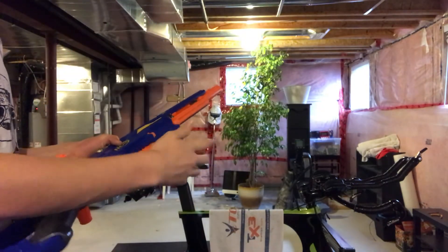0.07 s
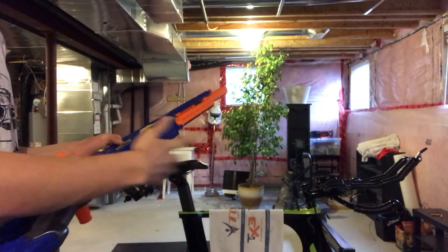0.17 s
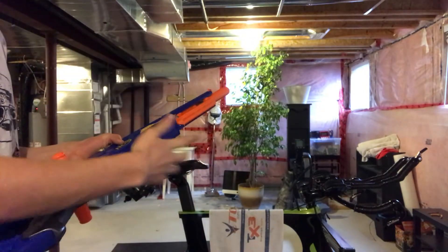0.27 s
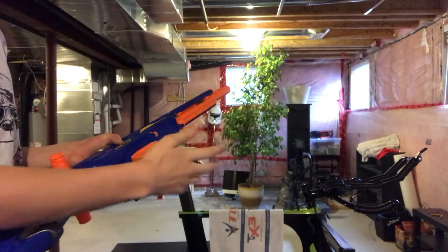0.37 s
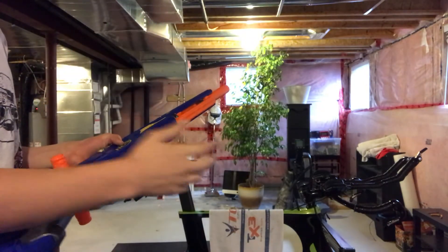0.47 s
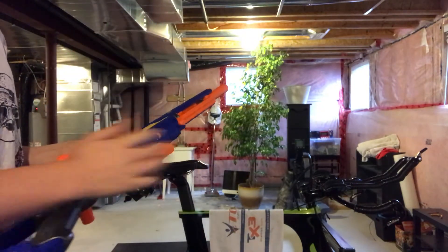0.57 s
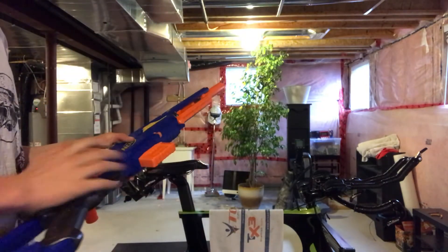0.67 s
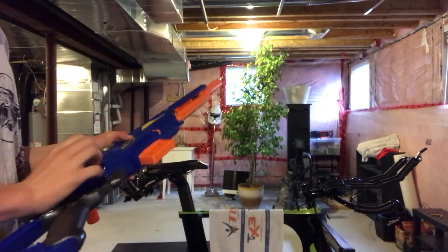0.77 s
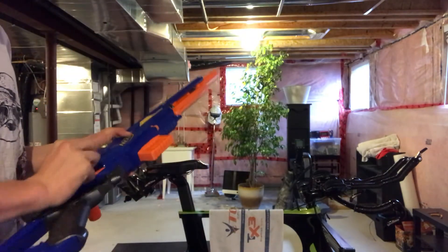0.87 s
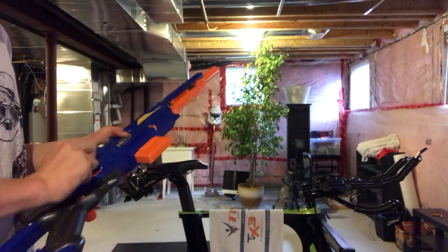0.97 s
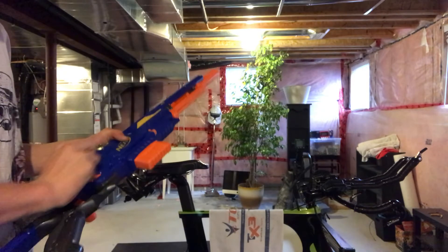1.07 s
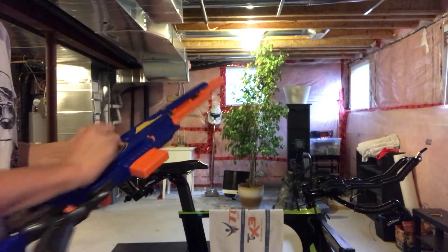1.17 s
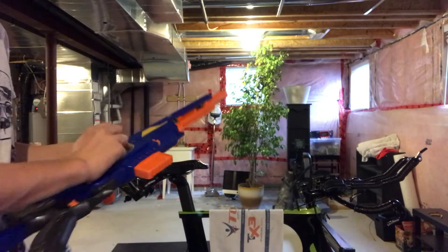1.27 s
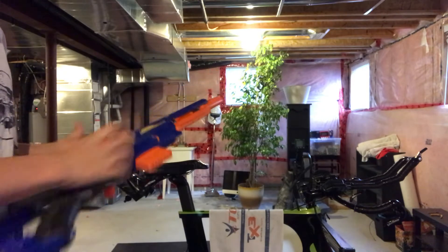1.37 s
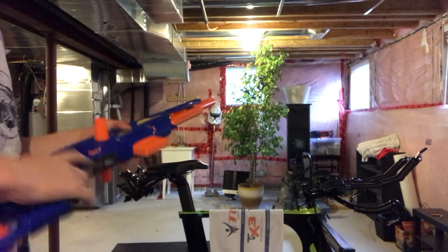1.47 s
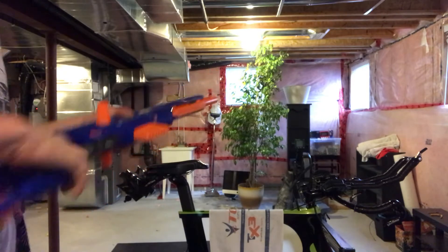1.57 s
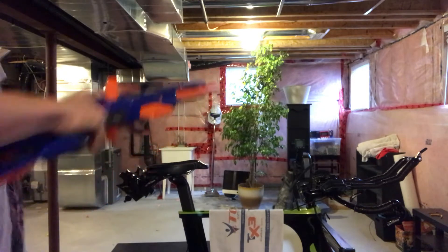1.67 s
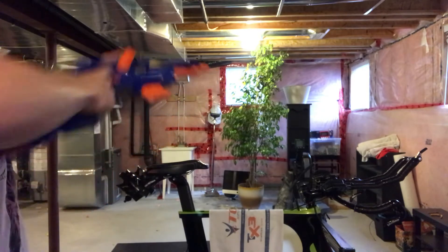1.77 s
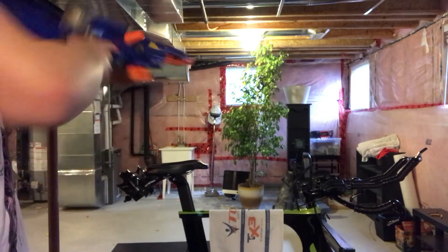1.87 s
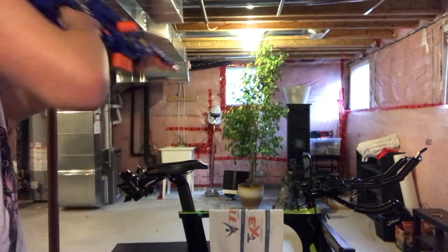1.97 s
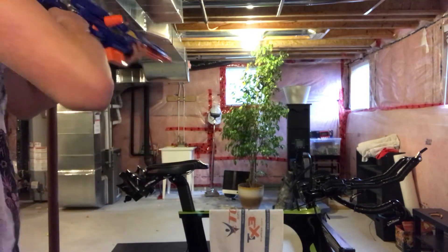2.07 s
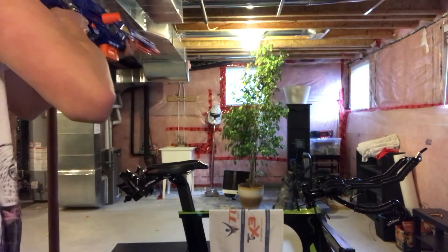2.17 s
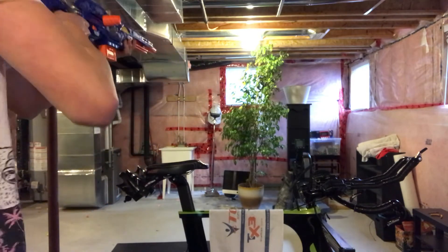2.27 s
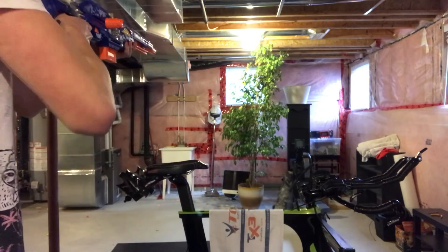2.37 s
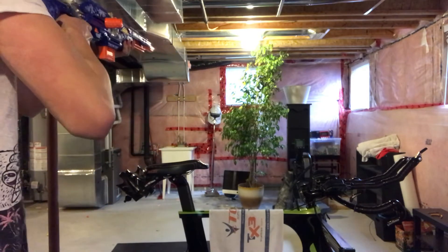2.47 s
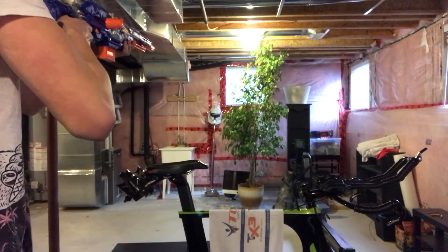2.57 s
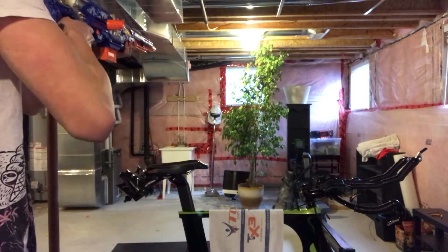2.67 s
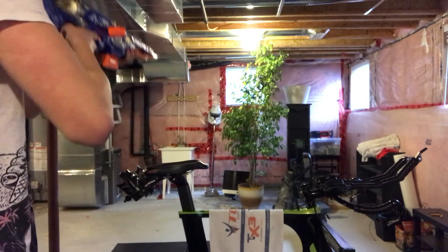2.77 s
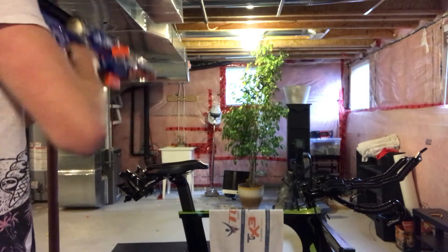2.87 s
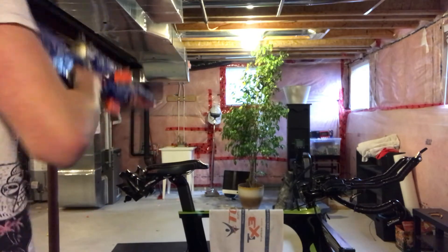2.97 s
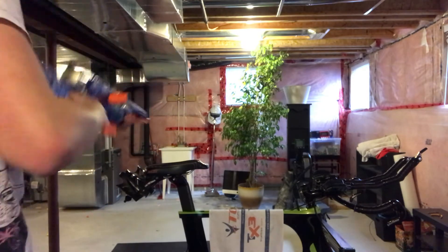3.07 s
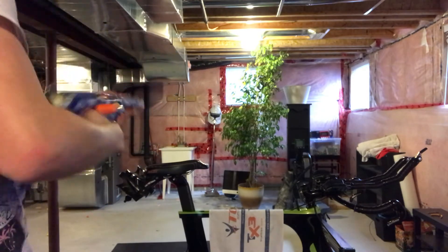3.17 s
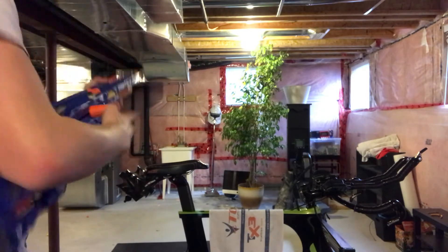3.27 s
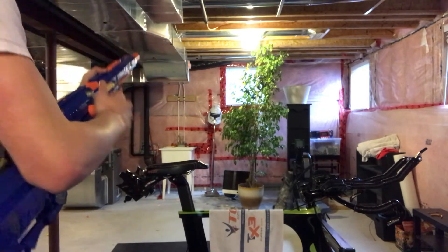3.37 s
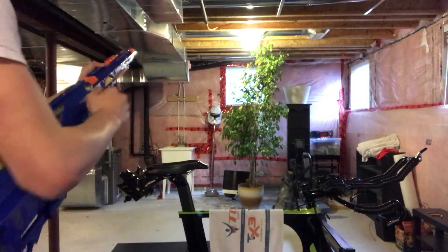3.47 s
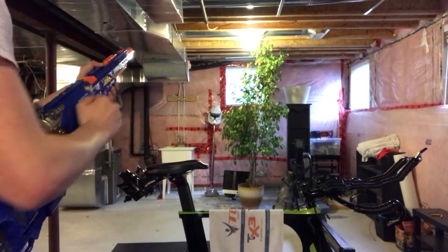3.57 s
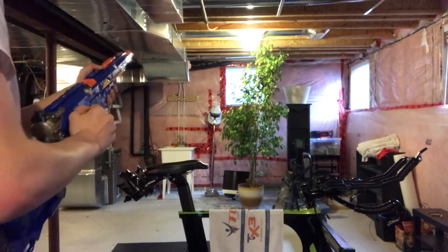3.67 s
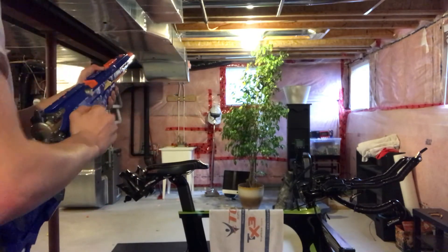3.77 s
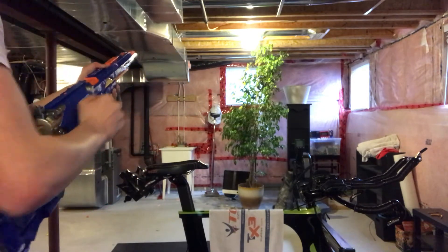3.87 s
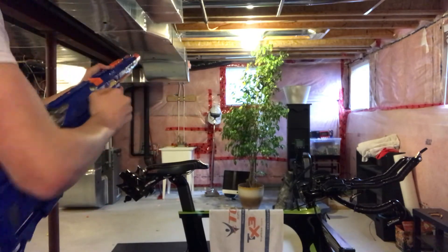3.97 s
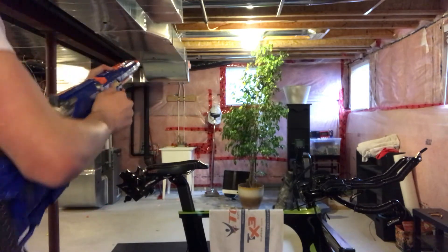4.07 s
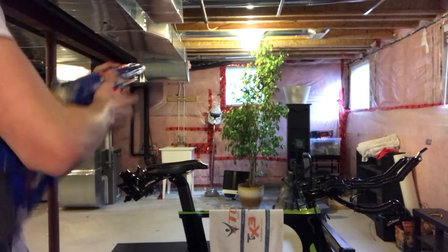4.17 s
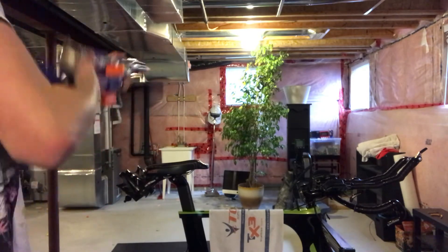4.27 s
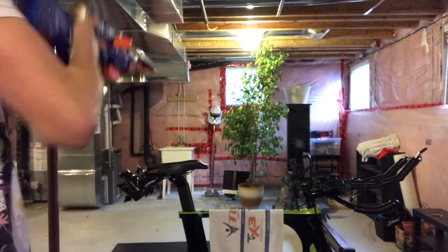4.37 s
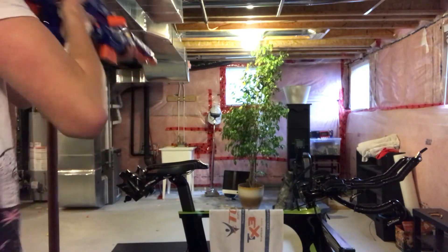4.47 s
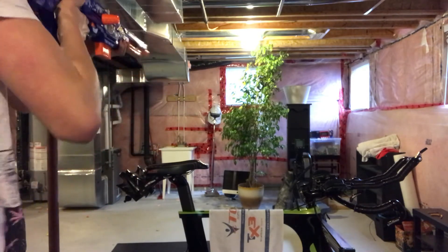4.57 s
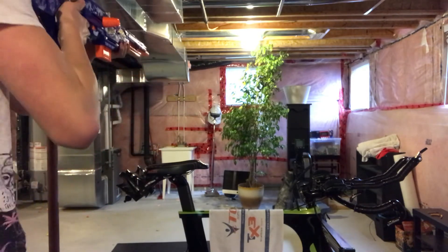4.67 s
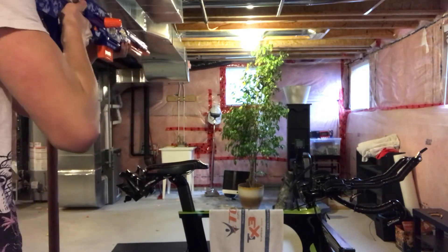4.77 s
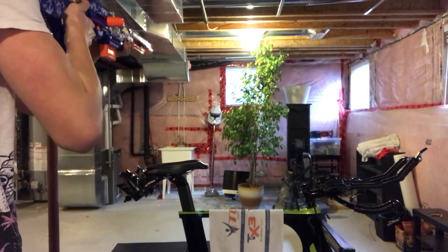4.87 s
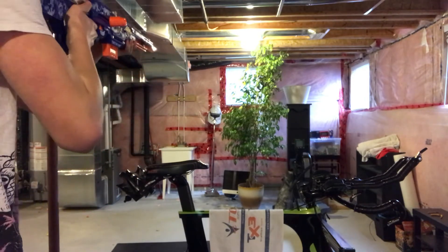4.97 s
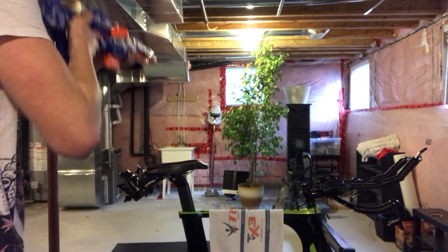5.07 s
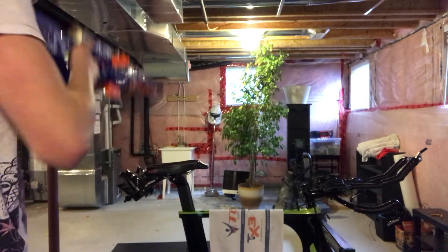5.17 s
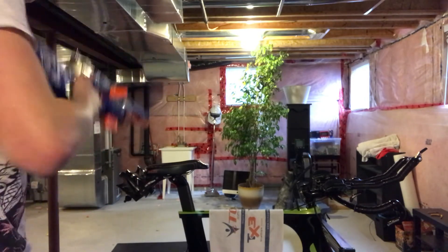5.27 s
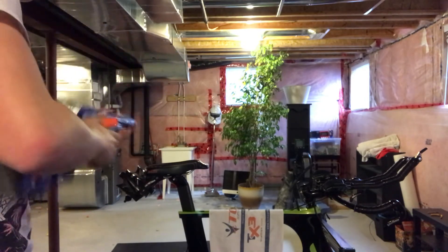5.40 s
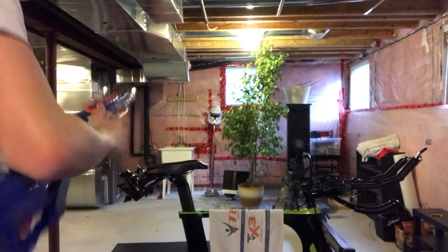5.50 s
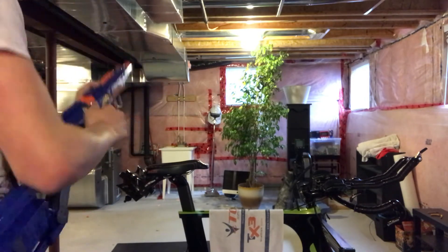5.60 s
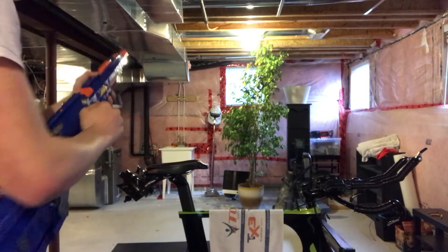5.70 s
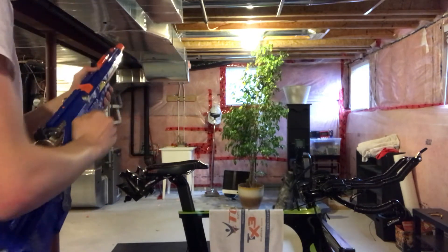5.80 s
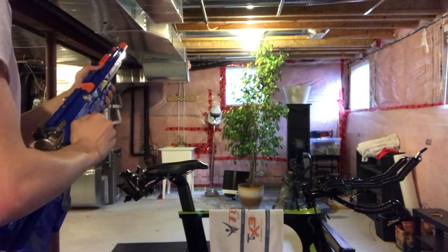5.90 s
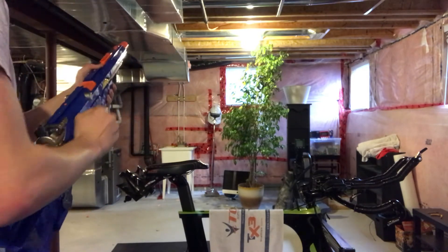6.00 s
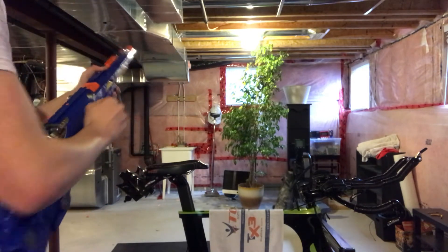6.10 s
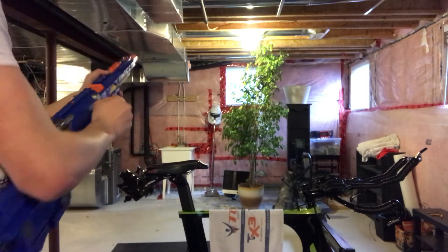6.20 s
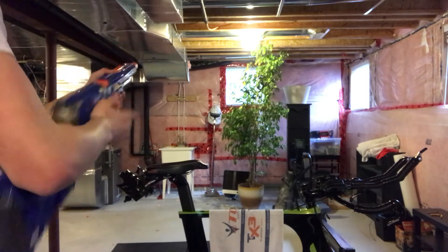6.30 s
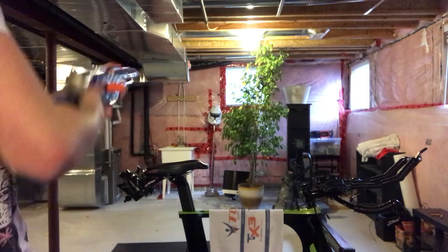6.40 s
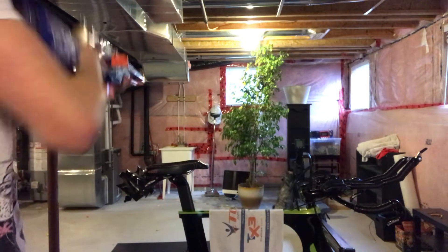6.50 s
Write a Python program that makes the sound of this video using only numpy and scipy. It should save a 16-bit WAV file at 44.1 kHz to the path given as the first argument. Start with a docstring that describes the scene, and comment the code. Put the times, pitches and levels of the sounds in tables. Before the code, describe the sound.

A hollow plastic toy gun is racked with sharp double clacks, handled, fired twice with springy thwacks, and racked again in a hard-walled room.

```python
"""In a bare basement room, close to a camera, a spring-driven plastic toy blaster is handled, cocked and fired twice.
Every contact is a short chatter of random micro-impacts that rings the hollow shell; shots and grip add low thuds.
Hands rub the shell between the clacks, made of clumpy noise grains ringing the same shell.
A wavering sine makes the mains hum, coloured noise the faint hiss; decaying noise makes the echoes."""
import sys
import numpy as np
from scipy import signal
from scipy.fft import rfft, irfft, next_fast_len
from scipy.io import wavfile
from scipy.ndimage import map_coordinates

SR = 44100
rng = np.random.default_rng(int(sys.argv[2]) if len(sys.argv) > 2 else 0)


def transcribe(signal):
    """Save signal, clipped to [-1, 1], as a 16-bit WAV file at the path in sys.argv[1]."""
    frames = np.atleast_2d(signal).T
    limited = np.clip(frames, -1, 1)
    pcm = np.round(limited * 32767).astype(np.int16)
    wavfile.write(sys.argv[1], SR, pcm)


N = 288414  # length in samples

# Colour of the hiss. Each row: frequency in Hz, relative level in dB per Hz.
HISS_COLOUR = [(15, -56.5), (30, -26), (45, -16.5), (60, -9.5), (80, -13), (125, -10.5), (250, -14),
               (600, -20), (1300, -21), (2000, -25), (3200, -30), (3800, -27.5), (5000, -31.5),
               (15600, -39)]
HISS_DB, HUM_DB, HUM_HZ = -68.5, -74, 59.86

# Modes, the tones the plastic shell rings at. Each row: frequency in Hz, width in Hz, relative level in dB.
SHELL_MODES = [(215.3, 50, -16.5), (318.9, 35, -7.5), (405.3, 66, -4.5), (579.5, 69, -3.5),
               (710.9, 67, 5.5), (785.7, 65, 1), (925.8, 127.4, -1), (1271.3, 171.5, 0),
               (1432.7, 334.5, -3.5), (1887.3, 280, 2.5), (2300.6, 240, 0.5), (2546.3, 423, -1),
               (3116.7, 626.5, 0.5), (3636.7, 1165, 0), (4183.5, 693, 1), (4624, 680, -3.5),
               (5500.8, 677, -3.5), (6640, 1000, -7.5), (8132, 680, -7.5), (8719, 1000, -9.5),
               (12110, 2200, -12), (14470, 3700, -16.5)]
# Borders in Hz between the hollow, knock, crack and snap groups of modes.
PART_BORDERS_HZ = [600, 2000, 5500]

# In the contact tables, level is that of the knock part; hardness and hollowness are relative to it.
# Chatter is the time scale of the burst, held between 0.5 and 18 ms when played.

# Catches and parts click while the slide travels.
# Each row: start in seconds, level in dB, hardness in dB, hollowness in dB, chatter in ms.
CLICKS = [(0.081, -30.5, -10.5, -17.5, 3.26), (0.087, -39.5, -9.5, -8, 10.2),
          (0.114, -58.5, 1.5, -4.5, 4.4), (1.004, -48.5, -8, -25, 9.9), (1.012, -54.5, -8.5, -3.5, 14.9),
          (1.055, -44.5, 0.5, -7, 2.8), (1.067, -40, -14, -18.5, 3.6), (1.079, -40, -17, -15.5, 11.1),
          (1.09, -29.5, -37, -32, 1.98), (1.102, -44.5, -1.5, -30, 9.2), (1.111, -29, -11.5, -20.5, 3.42),
          (1.121, -32.5, -13, -20, 16), (3.427, -49.5, -6, -10.5, 6.9), (3.439, -42.5, -9, -28.5, 15.5),
          (3.45, -35.5, -0.5, -11, 4.55), (3.486, -40.5, -13, -3.5, 8.17), (3.523, -41, 6.5, -21.5, 5.63),
          (3.692, -46, -1, -3, 5.4), (3.724, -46, -7.5, -26, 1.8), (3.732, -46, -7.5, -11.5, 13),
          (3.775, -52.5, -12, -2, 8.6), (3.822, -44, 8, -4, 2.44), (3.831, -44, 5, -2.5, 3.4),
          (3.842, -37.5, -13.5, -3, 2.6), (3.849, -36.5, -6.5, -1.5, 4.1), (5.608, -43, -6, -26.5, 5.34),
          (5.62, -46, -7, -26.5, 13.8), (5.64, -39, 1.5, -6.5, 3.26), (5.657, -40, -35, -12.5, 8.3),
          (5.681, -34, -16, -7.5, 6.14), (5.712, -36, 1, -12, 5.9), (5.912, -48, -10.5, -26.5, 15.2),
          (5.952, -53, 2, -15.5, 6.5), (5.981, -41, -18.5, -3.5, 4.6), (6.02, -45, 2, -9, 11.8),
          (6.04, -40, -10, -5, 12)]
# The slide slams into an end stop and rebounds with a duller knock.
# Each row: start in seconds, level in dB, hardness in dB, hollowness in dB, knock pitch in Hz,
# chatter in ms, rebound level in dB.
SLIDE_STOPS = [(0.131, -20.5, -10.5, -5, 1115, 4.67, -39.5), (1.13, -24.5, 1, -16, 1428, 5.54, -33.5),
               (3.566, -30, 3, -11, 1455, 8.24, -31.5), (3.876, -27.5, 6, -18.5, 1410, 5.47, -26.5),
               (5.749, -30, 4, -9, 1228, 6.68, -28.5), (6.067, -27.5, 4.5, -14.5, 1819, 6.23, -26.5)]
REBOUND_AFTER_S, REBOUND_MS, REBOUND_HARD_DB, REBOUND_HOLLOW_DB = 0.008, 4, -10.5, -13
# Single ticks of the shell, among them two strong knocks just after the first shot.
# Each row: start in seconds, level in dB, hardness in dB, chatter in ms.
TICKS = [(0.684, -49.5, -20, 7.84), (0.714, -51, -12, 2.54), (0.744, -67, -0.5, 12), (0.76, -54, -19, 7.7),
         (0.79, -52, -18, 7.9), (0.801, -65, 2.5, 1.47), (0.898, -55, -7, 4.7), (1.366, -68.5, 8.5, 22),
         (1.391, -56, -7, 41), (1.431, -46, -10, 5.2), (1.448, -44.5, -23, 3.24), (1.483, -59, -33, 2.9),
         (1.525, -60.5, -4.5, 20), (1.552, -52, -8, 8), (1.59, -63, -5.5, 8.2), (1.654, -54, -9, 5.2),
         (1.681, -57.5, -15.5, 13.2), (1.701, -52, -7.5, 3.27), (1.733, -54, -13.5, 4.8),
         (1.76, -51, -12, 6.64), (1.889, -43, -16, 1.91), (1.932, -66.5, -1, 9.6), (1.988, -50, -17.5, 6.4),
         (2.021, -58, -8.5, 7.8), (2.072, -66, -9, 10.1), (2.104, -63, -11, 13.4), (2.157, -52, -17, 8.3),
         (2.354, -66.5, -5, 7.2), (2.451, -65, -2.5, 4.3), (2.47, -57.5, -17.5, 2.8),
         (2.496, -56.5, -15, 13.3), (2.581, -23.5, -15, 3.9), (2.588, -31, -16.5, 5.8),
         (2.711, -56, -11, 9.5), (2.908, -52.5, 0.5, 2.97), (2.923, -49.5, -17.5, 9.4),
         (3.008, -53, -13.5, 5.7), (3.046, -54.5, 5, 1.92), (3.096, -47, -7, 3.45), (3.12, -36, -18, 2.78),
         (3.293, -43.5, -12, 3.44), (3.317, -45, -15.5, 6.7), (3.375, -54, -20.5, 7.4),
         (3.39, -46, -11.5, 4.5), (4.089, -43.5, -9, 2.98), (4.169, -49.5, -8.5, 7.1),
         (4.177, -41.5, -8, 5.03), (4.193, -40.5, -16.5, 8.5), (4.226, -50, -25.5, 8.8),
         (4.304, -48.5, -16.5, 4.67), (4.322, -48, -17.5, 10.55), (4.427, -56.5, -8, 2.86),
         (4.468, -49.5, -12.5, 6.1), (4.488, -50, -22.5, 5.76), (4.59, -63, -24, 6.16),
         (4.786, -67.5, 0.5, 10.4), (5.109, -63.5, -2, 5.96), (5.199, -49, -15.5, 15.3),
         (5.227, -49, -3.5, 3.1), (5.348, -68.5, -1.5, 4.9), (5.428, -47.5, -14, 2.85),
         (5.439, -48.5, -6.5, 3.04), (5.454, -38, -12, 5.34), (5.532, -43, -12.5, 6.9),
         (5.564, -57, 2, 3.1), (6.171, -44.5, -15, 6.2), (6.337, -47.5, -6.5, 4.9), (6.354, -51, -16, 10.6),
         (6.431, -54, -17, 4.3), (6.514, -64, -15, 8.5)]
TICK_HOLLOW_DB = -12
# Faint ticks at random moments, their average level set over the rubbing.
FAINT_COUNT, FAINT_OVER_RUB_DB, FAINT_HARD_DB, FAINT_MS = 70, 1.5, -8.5, 5.8
# The plunger slams home. Each row: time of the slam in seconds, level in dB.
SHOTS = [(2.523, -25), (4.827, -25.5)]
# What every shot goes through, from the release over slam and rattle to the dart striking far away.
# Each row: delay after the slam in seconds, level over the slam in dB, hardness in dB, hollowness in dB,
# chatter in ms.
SHOT_STEPS = [(-.011, -9, -2.5, -6.5, 7.6), (0, 0, 1.5, -14, 3.5), (.008, -4.5, -2.5, -19, 9.47),
              (.029, -11.5, 8, -11.5, 4), (.04, -2.5, -3, -20, 4.3), (.057, -12, 0.5, -13, 12),
              (.087, -19, -8, -13, 24), (.154, -20, -5.5, -12.5, 12.75)]

KNOCK_HZ, KNOCK_SCATTER_OCTAVES = 1167, 0.11  # where a struck spot favours the knock modes
CRACK_HZ, CRACK_HZ_PER_DB = 3404, 41  # harder contacts favour higher crack modes
PLUNGER_KNOCK_HZ, PLUNGER_CRACK_HZ = 1165, 3800  # the plunger always strikes the same spot
CRACK_DB, CRACK_FOLLOWS = 2, 0.579  # crack over knock, and the share of the hardness it takes on

# How fast the room's echoes die. Each row: frequency in Hz, time to fade by 60 dB in seconds.
ROOM_FADE = [(100, 0.28), (500, 0.2394), (1400, 0.3212), (3700, 0.3472), (9700, 0.31), (15000, .2)]

# Rubbing by hands and slide, one curve for each spell of handling.
# Each row of a curve: time in seconds, level of the dull slips in dB.
RUB_SPELLS = [
    [(0.66, -82.5), (0.746, -68), (0.892, -80.5), (1.016, -62.5), (1.258, -61), (1.386, -79), (1.706, -61),
     (1.802, -72), (2.08, -63.5), (2.3, -94.5)],
    [(2.85, -73.5), (2.954, -64), (3.376, -70.5), (3.506, -48.5), (3.642, -60), (3.766, -53), (4.128, -64),
     (4.404, -68), (4.65, -76.5)],
    [(4.95, -60), (5.06, -61), (5.248, -84.5), (5.48, -64), (5.61, -59.5), (5.862, -58.5), (6.036, -49),
     (6.194, -69), (6.372, -76.5), (6.54, -79)],
]
RUB_BRIGHT_DB = -4.5  # the unmuffled slips over the dull ones

# The grip thuds in the hand. Each row: start in seconds, level in dB, pitch in Hz.
GRIP_THUDS = [(1.061, -51.5, 141.3), (3.011, -36.5, 335), (3.025, -36.5, 227.6), (3.297, -52.5, 136.8),
              (5.2, -49.5, 290), (5.455, -41, 400)]
# Low swings of barrel air and stock in every shot.
# Each row: delay after the slam in seconds, level over the slam in dB, pitch in Hz.
SHOT_THUDS = [(0.0012, 3.5, 352), (0.0028, -7.5, 120), (.026, -1, 210), (0.019, 3, 315), (.057, -17.5, 85)]

EDGE_HZ, TOP_HZ = 15750, 16800  # upper edge: a steep treble drop, then near silence above the top


def amp(db):
    """Turn decibels into a plain multiplier."""
    return 10 ** (np.asarray(db) / 20)


def unit(x):
    """Scale each row to an average strength (RMS) of one."""
    return x / np.sqrt(np.mean(np.abs(x) ** 2, axis=-1, keepdims=True) + 1e-20)


def along(points, hz):
    """Read a curve of (Hz, value) points on a log frequency axis."""
    f, v = np.transpose(points)
    return np.interp(np.log(hz + 1), np.log(f + 1), v)


def wobble(rate):
    """A smooth random curve with rate knots a second."""
    knots = rng.standard_normal(int(N * rate / SR) + 4)
    return map_coordinates(knots, [np.arange(N) * rate / SR])


def filtered(x, response):
    """Pass x through a complex response of frequency."""
    n = x.shape[-1]
    m = next_fast_len(n + 4096)  # spare room so the end does not wrap round to the start
    return irfft(rfft(x, m) * response(np.fft.rfftfreq(m, 1 / SR)), m)[..., :n]


def ringing(modes, hz):
    """Each mode is a resonance that rings on after a push; one row per mode."""
    centre, width, db = np.transpose(modes)[:, :, None]
    sign = (-1.) ** np.arange(len(modes))[:, None]
    return sign * amp(db) * 1j * hz * width / (centre ** 2 - hz ** 2 + 1j * hz * width)


def background():
    """Coloured noise makes a hiss and a sine makes the mains hum; both waver a little."""
    t = np.arange(N) / SR
    hiss = unit(filtered(rng.standard_normal(N), lambda hz: amp(along(HISS_COLOUR, hz))))
    hum = np.sqrt(2) * np.sin(2 * np.pi * HUM_HZ * t + 0.6 * wobble(13.0))
    hiss_level = amp(HISS_DB + 1.4 * wobble(8.6))
    hum_level = amp(HUM_DB + 0.8 * wobble(4.4))
    return hiss_level * hiss + hum_level * hum


def faint_ticks():
    """Random light ticks follow the loudness of the rubbing and vary in strength, hardness and length."""
    when = rng.uniform(0, N / SR, FAINT_COUNT)
    luck = rng.standard_normal((FAINT_COUNT, 3))
    return [(s, rub_db(s) + FAINT_OVER_RUB_DB + 3 * a, FAINT_HARD_DB + 7 * b, TICK_HOLLOW_DB, FAINT_MS * 1.3 ** c)
            for s, (a, b, c) in zip(when, luck)]


def contact_rows():
    """List every contact in time order; where and how hard the shell is struck sets the modes it favours.
    Each row: seconds, level dB, hardness dB, hollowness dB, chatter ms, knock Hz, crack Hz."""
    rows = [(s, db, hard, hollow, ms) for s, db, hard, hollow, _, ms, _ in SLIDE_STOPS]
    rows += [(s + REBOUND_AFTER_S, db, REBOUND_HARD_DB, REBOUND_HOLLOW_DB, REBOUND_MS)
             for s, *_, db in SLIDE_STOPS]
    first_shot = len(rows)
    rows += [(s + after, db + over, *rest) for s, db in SHOTS for after, over, *rest in SHOT_STEPS]
    shots = slice(first_shot, len(rows))
    rows += CLICKS
    rows += [(s, db, hard, TICK_HOLLOW_DB, ms) for s, db, hard, ms in TICKS]
    rows += faint_ticks()
    knock_hz = KNOCK_HZ * 2 ** (KNOCK_SCATTER_OCTAVES * rng.standard_normal(len(rows)))
    knock_hz[:len(SLIDE_STOPS)] = np.transpose(SLIDE_STOPS)[4]
    crack_hz = CRACK_HZ + CRACK_HZ_PER_DB * np.transpose(rows)[2]
    knock_hz[shots], crack_hz[shots] = PLUNGER_KNOCK_HZ, PLUNGER_CRACK_HZ
    rows = np.column_stack([rows, knock_hz, crack_hz])
    return rows[np.argsort(rows[:, 0])]


def chatter_spectra(chatter_s, size):
    """A contact is a burst of uneven micro-impacts that swells quickly and dies away; return its spectrum."""
    grain = 12  # samples in one micro-impact
    u = np.arange(size) / SR / chatter_s
    noise = rng.standard_normal((len(chatter_s), size))
    strengths = amp(4.16 * rng.standard_normal((len(chatter_s), size // grain)))
    uneven = np.repeat(strengths, grain, axis=1)  # a few micro-impacts stand out
    return rfft(noise * uneven * u ** 0.5 * np.exp(-u ** 1.133))


def contacts(count):
    """Each contact chatters for some ms and rings the shell at new mode strengths.
    Returns the direct sound and the streams that go out to the walls, where contacts take turns."""
    s, knock_db, hard_db, hollow_db, chatter_ms, knock_hz, crack_hz = contact_rows().T
    crack_db = CRACK_DB + CRACK_FOLLOWS * hard_db
    part_db = knock_db + [hollow_db, 0 * s, crack_db, hard_db]  # hollow, knock, crack, snap
    size = 3072  # samples of a contact
    hz = np.fft.rfftfreq(size, 1 / SR)
    chatter_s = np.clip(chatter_ms, 0.5, 18)[:, None] / 1000
    chatter = chatter_spectra(chatter_s, size)

    small_shell = (1j * hz / (1j * hz + 170)) ** 2  # a small shell radiates little bass
    modes = small_shell * ringing(SHELL_MODES, hz)
    centre = np.transpose(SHELL_MODES)[0]
    part = np.searchsorted(PART_BORDERS_HZ, centre)
    off_knock = np.log2(centre / knock_hz[:, None])  # octaves away from the favoured pitch
    off_crack = np.log2(centre / crack_hz[:, None])
    favoured = amp(-22 * (part == 1) * off_knock ** 2 - 6.2 * (part == 2) * off_crack ** 2)
    struck = favoured * amp(2 * rng.standard_normal(favoured.shape))

    clack = spread = 0
    for k, db in enumerate(part_db):  # soft contacts wake the low modes, hard ones the high modes
        own = part == k
        level = amp(db)[:, None]
        clack = clack + level * unit(chatter * (struck[:, own] @ modes[own]))
        # all sides of the shell together give a smooth colour
        spread = spread + level * unit(favoured[:, own] @ modes[own])
    # longer chatter gets more energy, so the levels hold while it lasts
    clack, spread = irfft([clack, spread], size) * np.sqrt(1.754 * chatter_s * SR)

    near, out = np.zeros(N + size), np.zeros((count, N + size))
    for k, start in enumerate(np.round(s * SR).astype(int)):
        near[start:start + size] += clack[k]
        out[k % count, start:start + size] += spread[k]
    return near[:N], out[:, :N]


def room(streams, wet_db):
    """Each stream gets its own answer of the walls; each frequency dies at its own speed."""
    noise = rng.standard_normal((len(streams), SR // 2))
    hz, t, z = signal.stft(noise, SR, nperseg=256)
    fade = amp(-60 * t / along(ROOM_FADE, hz)[:, None])
    tail = signal.istft(z * fade, SR, nperseg=256)[1]
    late = np.arange(tail.shape[1]) / SR
    tail = tail * (1 - np.exp(-(late / 0.006) ** 2))  # the walls take some ms to answer
    clumps = map_coordinates(rng.standard_normal(200), [late * 160])
    # single surfaces stand out before the echoes blend
    tail = tail * amp(1.6 * clumps * np.exp(-late / 0.08))
    tail = tail / np.linalg.norm(tail, axis=1, keepdims=True)
    return amp(wet_db) * signal.fftconvolve(streams, tail, axes=1)[:, :N].sum(0)


def rub_db(t):
    """Level of the rubbing at times t; as good as silent between spells."""
    levels = [np.interp(t, *np.transpose(spell), left=-120, right=-120) for spell in RUB_SPELLS]
    return np.max(levels, axis=0)


def rubbing():
    """Skin and plastic slip in clumps of small grains that excite the shell."""
    clumping_db = 2.5 * wobble(60) + 3.5 * wobble(400) + 2 * wobble(20)
    grains = rng.standard_normal(N) * amp(clumping_db)
    slips = filtered(grains, lambda hz: ringing(SHELL_MODES, hz).sum(0))
    dull = unit(filtered(slips, lambda hz: 1 / (1 + 1j * hz / 1800) ** 2))  # treble muffled
    bright = amp(RUB_BRIGHT_DB) * unit(slips)
    return amp(rub_db(np.arange(N) / SR)) * (dull + bright)


def thuds():
    """Air in the barrel and the hollow stock swings a few times after each push."""
    out, t = np.zeros(N + SR), np.arange(SR // 5) / SR
    pushes = [(s + after, db + over, hz) for s, db in SHOTS for after, over, hz in SHOT_THUDS]
    for s, db, hz in pushes + GRIP_THUDS:
        rise = 1 - np.exp(-t * hz * 1.5)
        fade = amp(-60 * t * hz / 11)  # down by 60 dB after 11 swings
        start = round(s * SR)
        out[start:start + len(t)] += amp(db) * np.sin(2 * np.pi * hz * t) * rise * fade
    return out[:N]


def scene():
    """Add the direct sounds, their echoes off the walls and the background."""
    near, spread = contacts(count=4)
    loose = thuds() + rubbing()
    spread[0] += loose
    echoes = room(spread, wet_db=-6.0)
    return (near + loose + echoes + background())[None]


def record(dry):
    """Treble falls steeply at the edge and next to nothing is left above the top."""
    corners_hz = [EDGE_HZ - 120, EDGE_HZ + 120, TOP_HZ - 100, TOP_HZ]
    return filtered(dry, lambda hz: amp(np.interp(hz, corners_hz, [0, -24, -24, -90])))


dry = scene()
out = record(dry)
transcribe(out)
```